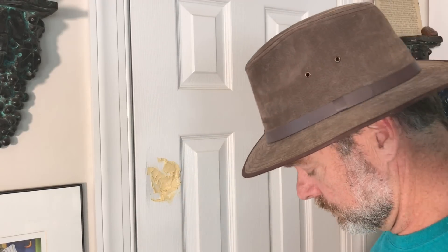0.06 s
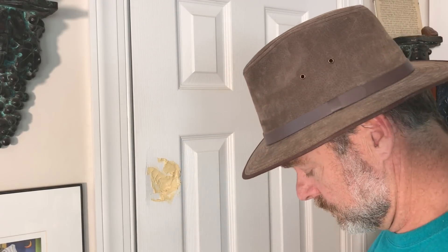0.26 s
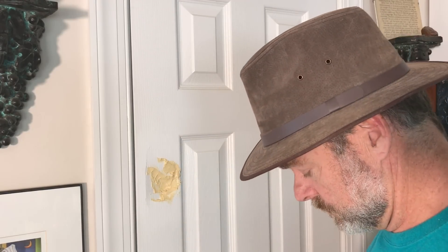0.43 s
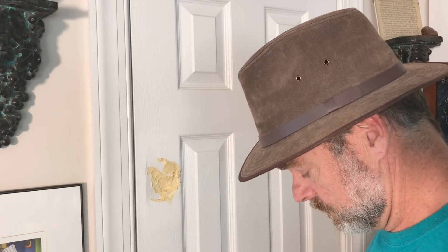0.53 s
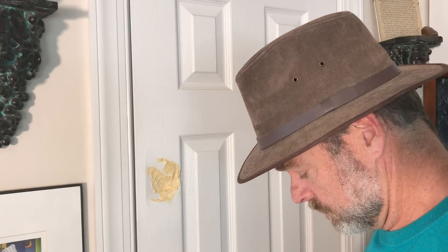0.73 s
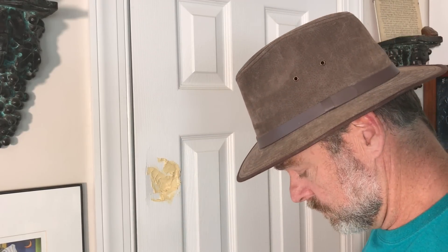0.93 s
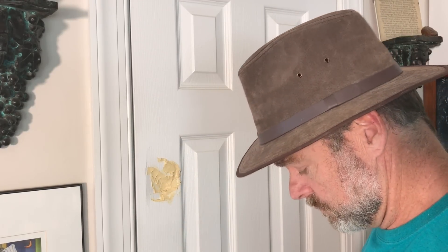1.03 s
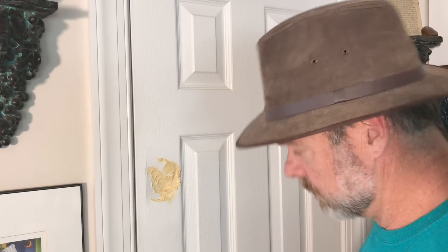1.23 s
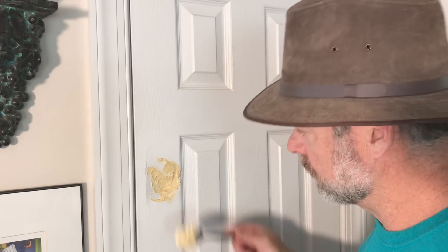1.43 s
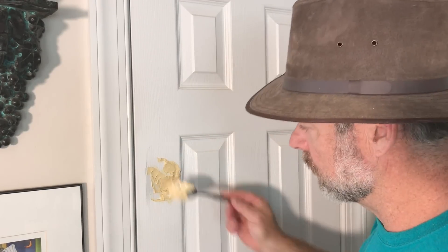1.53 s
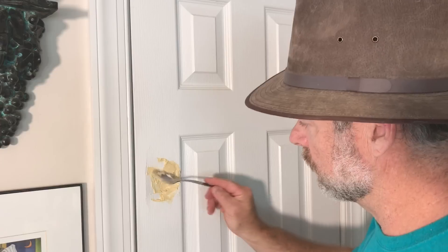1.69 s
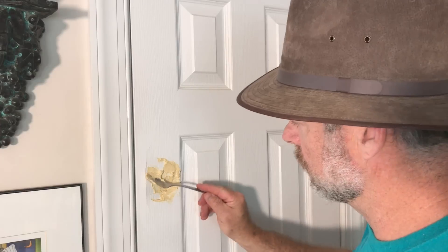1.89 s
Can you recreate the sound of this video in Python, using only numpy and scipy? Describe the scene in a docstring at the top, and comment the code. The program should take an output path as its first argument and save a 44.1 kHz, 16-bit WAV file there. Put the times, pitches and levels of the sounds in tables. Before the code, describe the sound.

A spoon knocks hard on a small tub of putty, then ticks and scrapes faintly indoors

```python
"""Throughout, appliances hum (sine lines, partly wavering) and air rushes softly (coloured noise).
From 0.22 s a metal spoon ticks faintly (noise bursts), a lively room answering each contact (decaying noise).
At 0.245 s it knocks hard on a small tub of putty (ringing modes and a crack of noise).
From 0.3 s a treble rustle of fine grains runs among more ticks, with a softer knock at 0.38 s.
From 0.74 to 1.03 s it scrapes along the wall (slips exciting the modes); near 1.28 s, a last soft contact."""
import sys
import numpy as np
from scipy import signal
from scipy.fft import rfft, irfft, next_fast_len
from scipy.io import wavfile

SR = 44100
rng = np.random.default_rng(int(sys.argv[2]) if len(sys.argv) > 2 else 0)


def transcribe(u):
    """Save the signal u as a 16-bit wav file named by the first command-line argument.

    u: samples, shape (n,) or (channels, n), limited to [-1, 1]; the rate is SR.
    q: integer samples, one column per channel.
    """
    v = np.clip(np.atleast_2d(u).T, -1, 1)
    q = np.round(v * 32767).astype(np.int16)
    wavfile.write(sys.argv[1], SR, q)


def ratio_of_db(decibels):
    """Turn decibels (scalar or array-like) into linear amplitude factors; 0 dB maps to 1."""
    return 10 ** (np.asarray(decibels, float) / 20)


N = 85995

# Air in the place, spectrum: [f/Hz, relative density/dB per Hz]
AIR_COLOUR = [(12, -63.5), (20, -28.5), (48, -8), (67, -6.5), (117, -11), (174, -4), (206, -9), (236, -6),
              (265, -12), (304, -6.5), (331, -16.5), (477, -17.5), (1080, -24), (1170, -21), (1740, -31),
              (15100, -40.5), (16400, -40.5)]
AIR_DB = -61.5
# Hum lines of the appliances: [f/Hz, steady level/dB, width of the wavering part/Hz]
HUM_LINES = [(60.1, -64.5, 3.5), (129.6, -73, 5.9), (174, -74, 20), (240.4, -64.5, 27), (300, -86, 11),
             (757, -83, 18), (1176, -79.5, 14)]
HUM_WAVER = 0.5  # wavering share beside the steady line

# Dry ticks of spoon and sticky putty: [t/s, level/dB, centre f/Hz, width/octaves, t60/s]
TICKS = [(.224, -63, 5200, .2, 0.022), (0.2435, -52, 13000, .3, .006), (0.3782, -35, 4630, 0.28, 0.012),
         (0.3794, -50.5, 6400, 0.67, 0.036), (0.3797, -36.5, 3470, 0.14, 0.016),
         (.456, -53, 9774, 0.61, .03), (0.4747, -46, 8740, 0.14, 0.03), (.476, -43, 14500, 0.24, 0.012),
         (.543, -52, 4536, 0.5, 0.013), (.565, -54, 1550, .15, 0.11), (.567, -58, 11110, .5, 0.038),
         (.589, -63, 9300, .2, 0.009), (.5955, -45.5, 3260, 0.79, 0.01), (.596, -48.5, 13500, 0.26, 0.0082),
         (.812, -60, 11000, 0.57, 0.012), (.828, -60, 5150, 0.11, 0.04), (.898, -55, 1060, 0.15, 0.033),
         (.969, -49, 4060, 0.025, .035), (.996, -58, 12530, .3, .008), (1.006, -51, 12200, 0.82, .01),
         (1.2674, -50.5, 1600, 0.44, 0.025), (1.2694, -56, 3400, .3, .014), (1.28, -61.5, 1112, 0.77, .15)]

# Decay of the room: [f/Hz, t60/s]
ROOM_DECAY = [(150, 0.083), (400, 0.53), (1000, 0.67), (2500, 0.56), (6000, 0.48), (10000, 0.39),
              (16000, 0.083)]
# Colour of the room's answer: [f/Hz, level/dB]
ROOM_COLOUR = [(100, -4), (300, 1), (1000, 0), (4000, -1.5), (9000, 0.5), (16000, 0.5)]
ROOM_DB, ROOM_DELAY_S, ROOM_RISE_S = -9, 0.0055, 0.0027

# Modes of the tub: [f/Hz, struck level/dB, t60/s, scraped level/dB at stroke start, scraped level/dB at its end]
TUB_MODES = [(340, -6, 0.016, -30, -25), (676, -11.5, 0.09, -26, -30.5), (897.2, -3, 0.034, -43, -43),
             (1077, -2, 0.07, -21, -3.5), (1158.4, -4, .04, -30, -14), (1325, 4, 0.023, -25.5, -25),
             (1455, -16.5, 0.035, -35, -7), (1800, -8, 0.021, -35, -8), (2120, -2, .05, -11, -34),
             (2500, -3, 0.011, -6, -40), (3097, -5.5, .035, -15, 0), (4102, -21, 0.013, 6, 0),
             (4500, 1, 0.0096, -14, -17), (5150, 5.5, 0.011, -5, -2), (5943, 4.5, 0.01, -24, -18),
             (6170, -10.5, .03, -28, -5.5), (7150, -17, 0.049, -17.5, -8), (7900, -8, 0.005, -5, -11),
             (8870, -24, .015, -6.5, -4.5), (9850, -15, 0.032, -9, -1.5), (11345, -30, .012, -24, -12),
             (14100, -30.5, .03, -26, -18)]
TUB_LOW_HZ = 162  # the tub radiates weakly below this
CONTACT_S = 0.0005  # time constant of the onset of a contact
# Blows on the tub: [t/s, level/dB, tilt about 1 kHz/dB per octave]
BLOWS = [(0.24, -67, -9), (.2447, -17.5, 0), (.2474, -24.5, -0.5), (0.2545, -25.5, -2), (.263, -34.5, -8.5),
         (0.378, -39.5, -5), (1.281, -62, -7)]
# Colour of the crack in each blow: [f/Hz, relative level/dB]
CRACK_COLOUR = [(150, -49), (500, 6.5), (1300, -1.5), (2500, 0.5), (3700, -8), (5000, -10.5), (6800, -22.5),
                (7800, -9), (10000, -13.5), (12500, -20), (16000, -24)]
CRACK_DB, CRACK_T60_S, MODE_SCATTER_DB = 2.5, 0.02, 0.5

# Course of the treble rustle, before its overall gain: [t/s, level/dB]
RUSTLE_COURSE = [(0.3, -66), (0.362, -84), (0.378, -56), (0.394, -74), (0.446, -67), (0.478, -59.5),
                 (0.494, -70), (0.538, -65), (0.57, -62), (0.586, -68), (0.594, -62), (0.622, -76),
                 (0.738, -80), (0.816, -72), (0.834, -73), (1.008, -73), (1.048, -82), (1.12, -79)]
# Colour of the rustle: [f/Hz, relative density/dB per Hz]
RUSTLE_COLOUR = [(1500, 15), (4000, 10), (8000, 11), (12000, 7.5), (15500, 10)]

# Pressure of the scraping stroke: [t/s, level/dB]
SCRAPE_PRESSURE = [(0.74, -69), (0.754, -71), (0.764, -64.5), (0.79, -68), (0.804, -62), (0.834, -64),
                   (0.846, -70.5), (0.882, -60), (0.904, -68), (0.932, -59.5), (0.954, -66), (0.974, -61),
                   (0.984, -93), (1.008, -91.5), (1.03, -75.5)]
# Travel of the contact along the wall: [start t/s, end t/s]
STROKE_S = (.8, .89)
GRAINS_PER_S, GRAIN_SPREAD_DB = 3600, 4
SCRAPE_DB, RASP_DB = -9, 0.5
FLICKER_DB, FLICKERS_PER_S = 4.5, 70

MIC_TOP_HZ = 15850


def unit(x):
    """Scaled to rms 1."""
    return x / np.sqrt(np.mean(x ** 2) + 1e-20)


def along(points, hz):
    """Curve through (f/Hz, value) points on a log frequency axis."""
    f, value = np.transpose(points)
    return np.interp(np.log(hz + 1), np.log(f + 1), value)


def gain_curve(rows):
    """A (t/s, level/dB) curve as gain per sample, silent outside its rows."""
    s, db = np.transpose(rows)
    return ratio_of_db(np.interp(np.arange(N) / SR, s, db, left=-150, right=-150))


def filtered(x, response):
    """The sound x shaped by a response of frequency."""
    size = next_fast_len(len(x) + SR // 4)
    spectrum = rfft(x, size) * response(np.fft.rfftfreq(size, 1 / SR))
    return irfft(spectrum, size)[:len(x)]


def add(track, s, sound):
    """Mixes a sound into the track at s seconds."""
    part = track[round(s * SR):][:len(sound)]
    part += sound[:len(part)]


def background():
    """Rushing air as coloured noise; hum as steady sines, each with narrow noise that makes it waver."""
    t = np.arange(N) / SR
    air = filtered(rng.standard_normal(N), lambda hz: ratio_of_db(along(AIR_COLOUR, hz)))
    out = ratio_of_db(AIR_DB) * unit(air)
    for line_hz, db, width_hz in HUM_LINES:
        noise = rng.standard_normal(N)
        waver = unit(filtered(noise, lambda hz: np.exp(-0.5 * ((hz - line_hz) / width_hz) ** 2)))
        steady = np.sqrt(2) * np.sin(2 * np.pi * (line_hz * t + rng.random()))
        out = out + ratio_of_db(db) * (steady + HUM_WAVER * waver)
    return out


def ticks():
    """Spoon and sticky putty tick dryly: short, decaying bursts of noise around one centre."""
    out, t = np.zeros(N), np.arange(SR // 8) / SR
    for s, db, centre_hz, octaves, t60 in TICKS:
        noise = rng.standard_normal(len(t))
        band = filtered(noise, lambda hz: np.exp(-0.5 * (np.log2((hz + 1) / centre_hz) / octaves) ** 2))
        envelope = ratio_of_db(db - 60 * t / t60) * (1 - np.exp(-t / 0.00058))
        add(out, s, envelope * unit(band))
    return out


def room(x):
    """The room answers after a short delay with a tail of noise, each frequency dying at its own speed."""
    hz, t, z = signal.stft(rng.standard_normal(SR), SR, nperseg=256)
    decay = ratio_of_db(-60 * t / along(ROOM_DECAY, hz)[:, None])
    tail = signal.istft(z * decay, SR, nperseg=256)[1]
    tail = tail * (1 - np.exp(-np.arange(len(tail)) / SR / ROOM_RISE_S))
    tail = filtered(tail / np.linalg.norm(tail), lambda f: ratio_of_db(along(ROOM_COLOUR, f)))
    delayed = np.pad(x, (round(ROOM_DELAY_S * SR), 0))
    return signal.fftconvolve(delayed, tail)[:N]


def ring(levels_db):
    """The tub's modes, one per row, swelling at the contact and dying away exponentially."""
    t = np.arange(SR // 4) / SR
    hz, _, t60 = np.transpose(TUB_MODES)[:3, :, None]
    phase = 2 * np.pi * rng.random(hz.shape)
    envelope = ratio_of_db(levels_db[:, None] - 60 * t / t60) * (1 - np.exp(-t / CONTACT_S))
    return envelope * np.sin(2 * np.pi * hz * t + phase)


def blows():
    """Each blow rings the tub and cracks briefly; softer contacts tilt to the bass."""
    out, t = np.zeros(N), np.arange(SR // 20) / SR
    hz, struck_db = np.transpose(TUB_MODES)[:2]
    for s, db, tilt_db in BLOWS:
        scatter_db = MODE_SCATTER_DB * rng.standard_normal(len(hz))
        modes = ring(db + struck_db + tilt_db * np.log2(hz / 1000) + scatter_db)
        add(out, s, modes.sum(0))

        def crack_response(f):
            return ratio_of_db(along(CRACK_COLOUR, f) + tilt_db * np.log2((f + 1) / 1000))

        crack = unit(filtered(rng.standard_normal(len(t)), crack_response))
        envelope = ratio_of_db(db + CRACK_DB - 60 * t / CRACK_T60_S) * (1 - np.exp(-t / CONTACT_S))
        add(out, s, envelope * crack)
    return out


def grains(rate, spread_db):
    """Random slips, rate per second, of either sign and uneven but bounded size."""
    hit = rng.random(N) < rate / SR
    size_db = spread_db * np.minimum(rng.exponential(size=N), 2)
    return unit(hit * np.sign(rng.standard_normal(N)) * ratio_of_db(size_db))


def rustle():
    """A fine, dense crackle of treble grains while the spoon moves in the putty."""
    fine = filtered(grains(5000, 2.8), lambda hz: ratio_of_db(along(RUSTLE_COLOUR, hz)) * (hz > 800))
    return ratio_of_db(4.5) * unit(fine) * gain_curve(RUSTLE_COURSE)


def scrape():
    """Slips of the spoon's edge ring the tub, each mode flickering as the contact travels, plus a dry rasp."""
    t = np.arange(N) / SR
    slips = grains(GRAINS_PER_S, GRAIN_SPREAD_DB) * gain_curve(SCRAPE_PRESSURE)
    travel = np.interp(t, STROKE_S, (0, 1))
    modes, ringing = ring(np.zeros(len(TUB_MODES))), np.zeros(N)
    for mode, (*_, start_db, end_db) in zip(modes, TUB_MODES):
        knots = rng.standard_normal(200)
        flicker = np.interp(t * FLICKERS_PER_S, np.arange(len(knots)), knots)
        drive = slips * ratio_of_db(start_db + (end_db - start_db) * travel + FLICKER_DB * flicker)
        answer = mode[:SR // 10] / np.linalg.norm(mode)
        ringing = ringing + signal.fftconvolve(drive, answer)[:N]

    def rasp_response(hz):
        low_cut = (hz / 1800) ** 2 / (1 + (hz / 1800) ** 2)
        return low_cut / (1 + (hz / 7000) ** 2)

    return ratio_of_db(SCRAPE_DB) * ringing + ratio_of_db(RASP_DB) * filtered(slips, rasp_response)


def scene():
    """Near sound of spoon and tub, too small to radiate deep bass, in the room, over the background."""
    near = blows() + ticks() + scrape() + rustle()
    near = filtered(near, lambda hz: 1j * hz / (TUB_LOW_HZ + 1j * hz))
    return (near + ratio_of_db(ROOM_DB) * room(near) + background())[None]


def top_cut(x):
    """Nothing passes above the cut-off."""
    return signal.sosfilt(signal.butter(12, 16540, fs=SR, output="sos"), x)


def record(dry):
    """The microphone chain rolls off steeply at the very top."""
    mix = filtered(dry[0], lambda hz: 1 / np.sqrt(1 + (hz / MIC_TOP_HZ) ** 80))
    return top_cut(mix[None])


dry = scene()
out = record(dry)
transcribe(out)
```